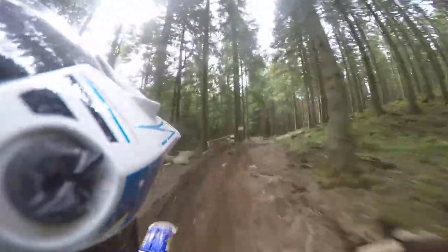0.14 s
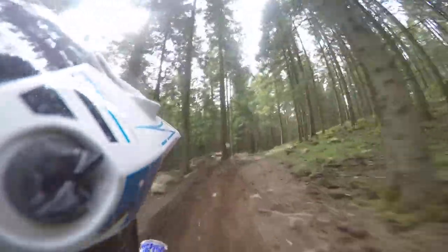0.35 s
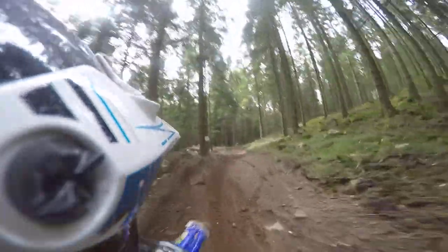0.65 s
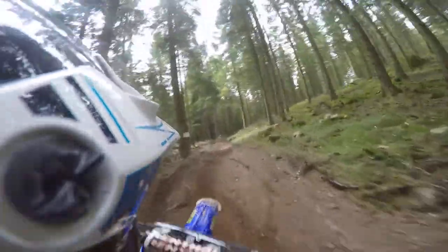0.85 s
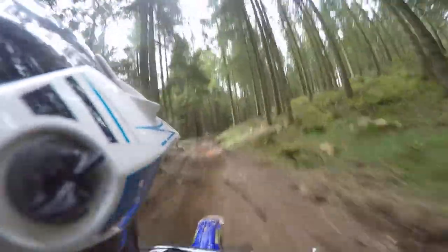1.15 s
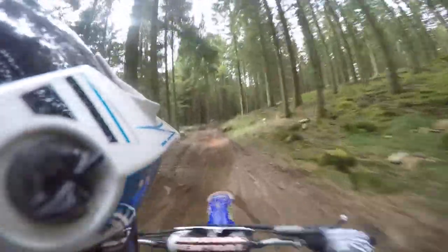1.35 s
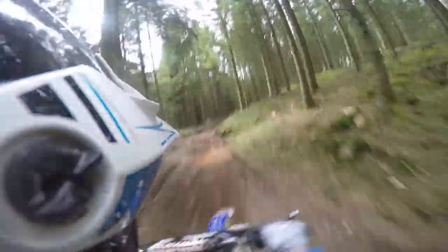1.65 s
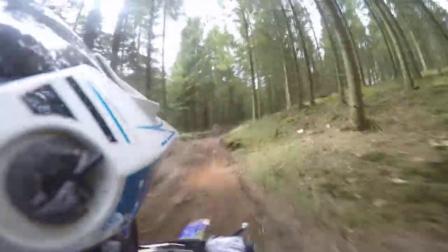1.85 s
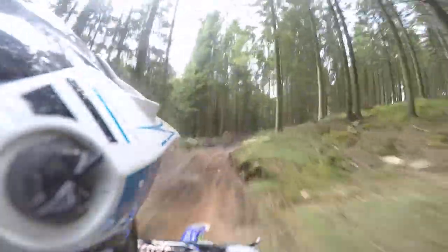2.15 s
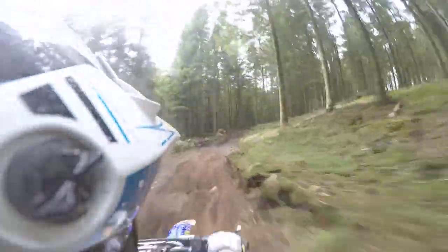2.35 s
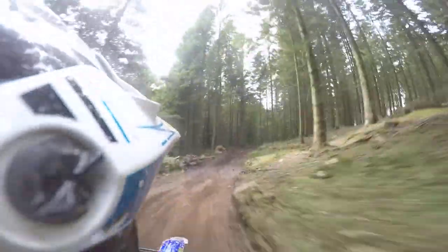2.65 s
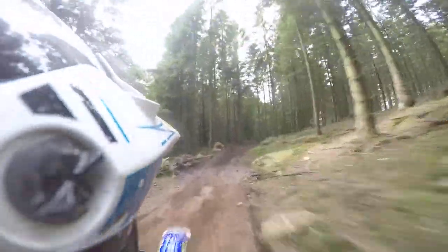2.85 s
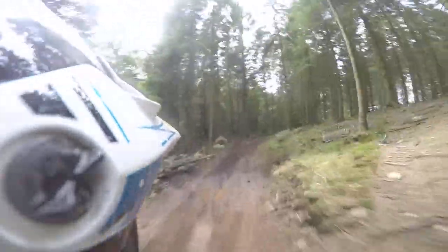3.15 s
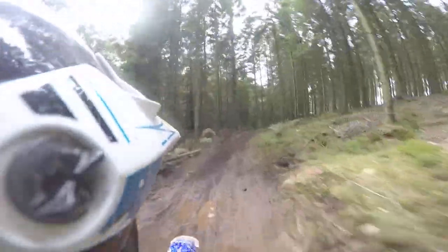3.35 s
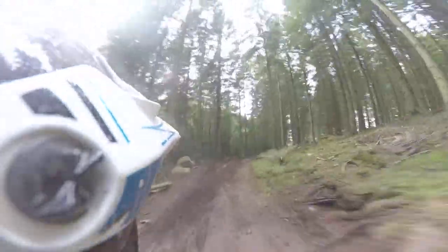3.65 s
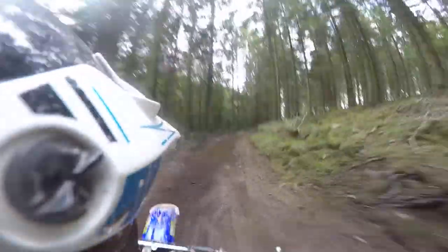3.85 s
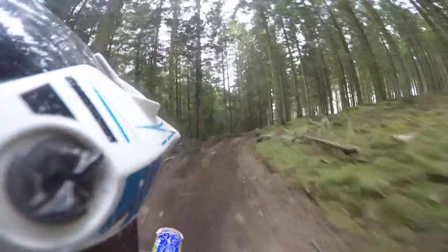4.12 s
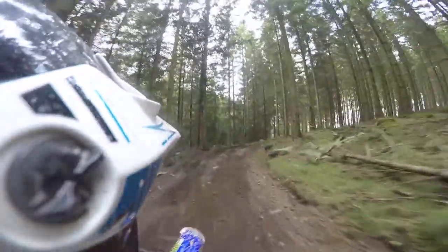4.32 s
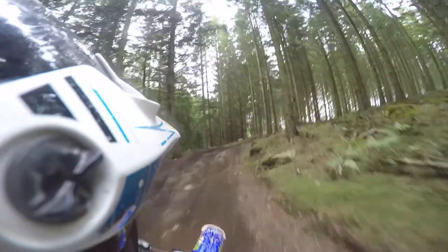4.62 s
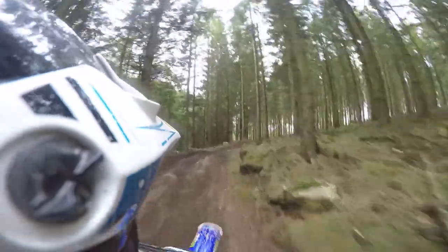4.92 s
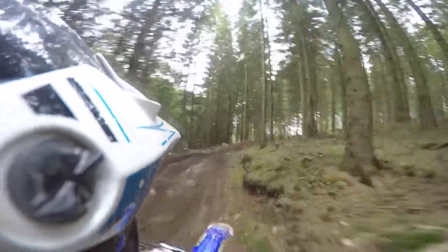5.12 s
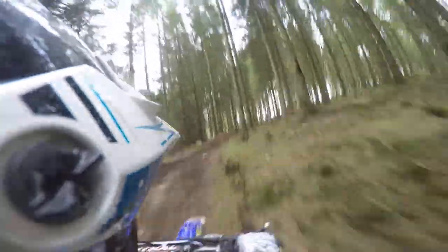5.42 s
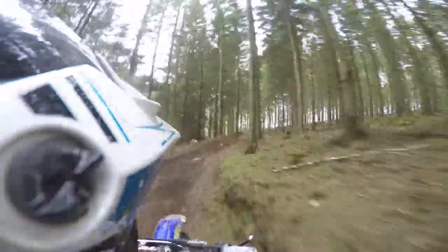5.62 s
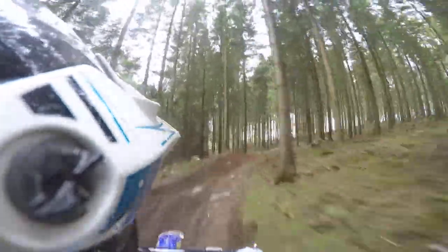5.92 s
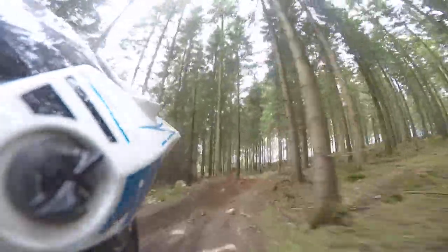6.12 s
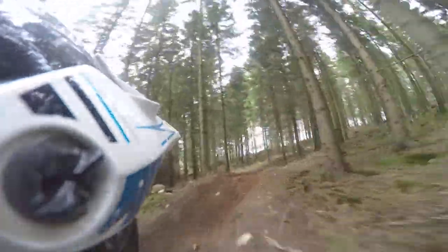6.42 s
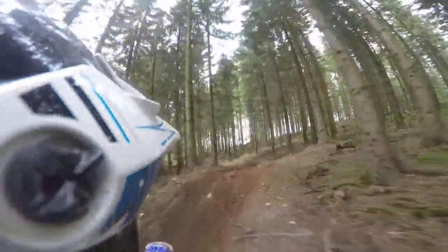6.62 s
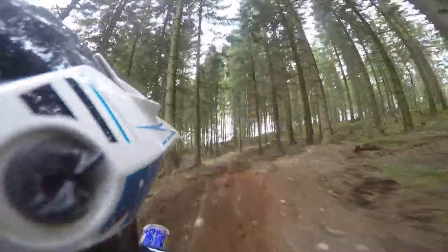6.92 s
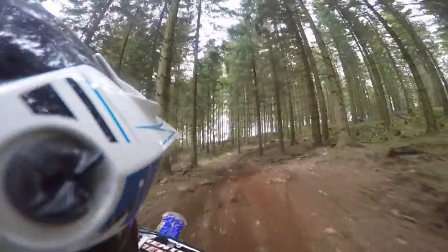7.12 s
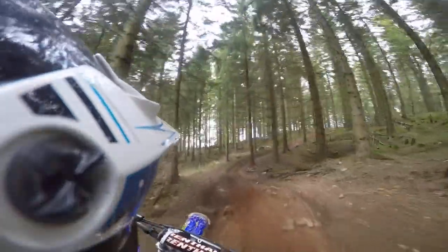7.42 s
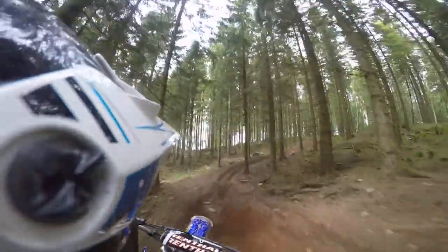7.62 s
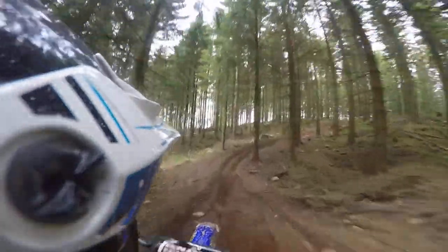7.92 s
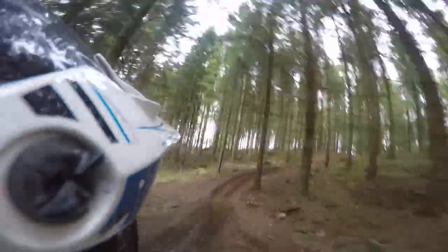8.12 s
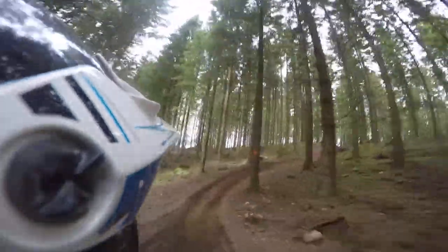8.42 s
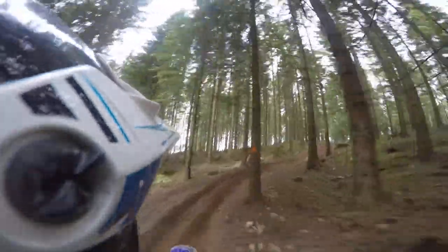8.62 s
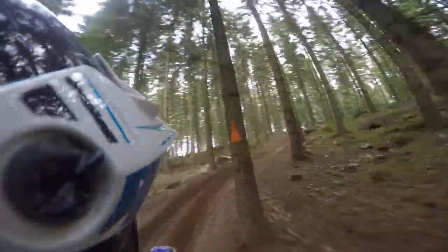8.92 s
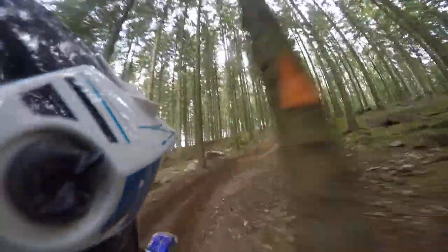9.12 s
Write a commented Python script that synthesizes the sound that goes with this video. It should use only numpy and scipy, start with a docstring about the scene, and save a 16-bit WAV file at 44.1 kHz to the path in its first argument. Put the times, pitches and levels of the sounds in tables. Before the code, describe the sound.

A two-stroke dirt bike snarls through forest, revving in ragged bursts, dropping to hollow popping overrun, with wind buffeting low at the rider's helmet.

```python
"""A two-stroke dirt bike on a forest track, with the microphone at the rider's helmet.
On the throttle every firing sends a sharp shock out of the exhaust and sets the pipe booming and the
silencer honking; the shocks scatter off bike, rider and ground, then off the trunks. Off the throttle the
engine pumps through the cold pipe and rattles, with stray pops. The chassis knocks over rough ground, and
wind, made of low shaped noise, buffets the microphone throughout."""
import sys
import numpy as np
from scipy import signal
from scipy.fft import rfft, irfft
from scipy.io import wavfile
from scipy.ndimage import uniform_filter1d

SR = 44100
rng = np.random.default_rng(int(sys.argv[2]) if len(sys.argv) > 2 else 0)


def wav_record(signal):
    """Record a signal, one row per channel, as 16-bit PCM in the file named by sys.argv[1]."""
    frames = np.transpose(np.atleast_2d(signal))
    bounded = np.clip(frames, -1, 1)
    # unit amplitude maps onto the largest positive 16-bit level
    quanta = np.round(bounded * 32767).astype(np.int16)
    wavfile.write(sys.argv[1], SR, quanta)


N = 408366
TIME = np.arange(N) / SR

# the tail of reflections off the trunks: time to fall by 60 dB [s]
TREES_T60_S = 0.42
# revs of ordinary raggedness [turns/s], and the steepness of the law
RAGGED_AT_HZ, RAGGED_POWER = 68.1, 0.94

# resonances of the silencer at the rest tuning and ordinary revs: (frequency [Hz], width [Hz], level [dB])
SILENCER_MODES = [(449.5, 71, 5), (523.6, 49, -1), (697, 110, -12), (1044, 84, -19)]
# hot gas tunes the silencer along with the pipe:
# the pipe resonance at which the silencer modes hold [Hz], and the share it follows (an exponent)
PIPE_REST_HZ, SILENCER_FOLLOWS = 291.3, 0.54
# faster gas flow brightens the silencer: [dB per octave for each turn/s above ordinary],
# up to these revs [turns/s]
BRIGHTEN_DB, FULL_FLOW_HZ = 0.41, 95.0
# the pipe's main resonance shifts with gas heat and flow; its width stays
BOOM_WIDTH_HZ = 100.0


def pipe(fired, turns, thump_hz=168.7, thump_width_hz=46.0, thump_db=-11.0, throb_db=-15.0):
    """Each firing thumps, sets the pipe booming and the silencer honking."""
    out = np.zeros(N)
    rates = revs(fired[:, 0])
    for (s, boom_db, boom_hz, honk_db, _), rate in zip(fired, rates):
        boom = ringing([(boom_hz, BOOM_WIDTH_HZ, 0), (thump_hz, thump_width_hz, thump_db)])
        heat = (boom_hz / PIPE_REST_HZ) ** SILENCER_FOLLOWS
        tilt_db = BRIGHTEN_DB * (min(rate, FULL_FLOW_HZ) - RAGGED_AT_HZ)
        honk_modes = []
        for hz, width, db in SILENCER_MODES:
            octaves_up = np.log2(hz / SILENCER_MODES[0][0])
            honk_modes.append((hz * heat, width, db + tilt_db * octaves_up))
        honk = ringing(honk_modes)
        add(out, s, from_db(boom_db) * at_rate(boom, rate) + from_db(honk_db) * at_rate(honk, rate))
    # reflections off the trunks
    out = out + from_db(-16) * through(out, scatter(TREES_T60_S))
    # the pulsing gas flow throbs at the firing rate itself; steady flow makes no sound
    boom_level = at_time(fired[np.argsort(fired[:, 0])], TIME)[0]
    throb = throttle() * from_db(boom_level + throb_db) * np.sin(2 * np.pi * turns)
    return signal.lfilter(*signal.butter(2, 30, "high", fs=SR), out) + throb


# reflections off bike, rider and ground: time to fall by 60 dB [s]
SCATTER_T60_S = 0.056
PIPE_ROUND_TRIP_S = .0036


def shocks(fired, likeness=0.96, steep_from_hz=123.0, steep_span_hz=55.0, size=2048):
    """The bare shock fronts, and their near reflections, which change a little from firing to firing."""
    fronts, scattered = np.zeros(N), np.zeros(N)
    fresh = rng.standard_normal((1024, size))
    fade = unit_energy(from_db(-60 * np.arange(size) / SR / SCATTER_T60_S))
    paths = fresh[-1]
    for (s, *_, crack_db), rate, new in zip(fired, revs(fired[:, 0]), fresh):
        keep = min(likeness, 1) ** raggedness(rate)
        paths = keep * paths + np.sqrt(1 - keep ** 2) * new
        # at high revs the wave that returns down the pipe steepens into a stronger second shock
        share = np.clip((rate - steep_from_hz) / steep_span_hz, .03, .5)
        for delay, part in ((0, 1 - share), (PIPE_ROUND_TRIP_S, share)):
            height = from_db(crack_db) * np.sqrt(part * SR / rate)
            add(fronts, s + delay, np.array([height]))
            add(scattered, s + delay, height * paths * fade)
    return fronts, scattered


# spectrum of the crack before the sizzle: (frequency [Hz], relative level [dB per Hz])
CRACK_SPECTRUM = [(300, -7), (700, -6.5), (850, -6), (1130, -2.5), (1420, -8.5), (1800, -5), (2300, -3),
                  (3050, 0.5), (3520, -8.5), (4950, -3.5), (6500, -14.5), (8760, -23), (13800, -29.5),
                  (16000, -33)]
# reflections off bike, rider and ground, then off the trunks, before the dulling filter [dB]
SCATTER_DB, TREES_DB = -3.5, -14


def crack(fired, level_db=-4.0, jet_db=-3.0, jet_s=0.0052, dull_hz=8100.0, tip_hz=4630.0,
          tip_width_hz=3300.0, sizzle_db=0.0, sizzle_db_per_hz=0.1539, cruise_hz=70.0):
    """Shocks leave the tailpipe with a puff of jet noise; they sizzle more as the revs rise."""
    fronts, scattered = shocks(fired)
    fade = np.exp(-1 / (jet_s * SR))
    jet_power = signal.lfilter([1 - fade], [1, -fade], fronts ** 2 + 1e-18)
    jet = np.sqrt(jet_power * raggedness(revs(TIME))) * rng.standard_normal(N)
    # the tailpipe spreads each front over two quick swings (an all-pass)
    r = np.exp(-np.pi * tip_width_hz / SR)
    poles = [1, -2 * r * np.cos(2 * np.pi * tip_hz / SR), r * r]
    direct = signal.lfilter(poles[::-1], poles, fronts) + from_db(jet_db) * jet
    trees = from_db(TREES_DB) * through(fronts, scatter(TREES_T60_S))
    echoes = from_db(SCATTER_DB) * scattered + trees
    dulled = signal.lfilter(*signal.butter(1, min(dull_hz, SR / 2 - 1), fs=SR), echoes)
    sound = through(direct + dulled, colour(CRACK_SPECTRUM))
    # the top is split off by a crossover and follows the revs
    low, top = (crossover(sound, side) for side in ("low", "high"))
    sizzle = from_db(sizzle_db + sizzle_db_per_hz * (revs(TIME) - cruise_hz))
    return from_db(level_db) * (low + sizzle * top)


def crossover(sound, side, split_hz=7500):
    """One side of a crossover: a second-order filter run twice."""
    once = signal.butter(2, split_hz, side, fs=SR, output="sos")
    return signal.sosfilt(np.tile(once, (2, 1)), sound)


def bark(fired, bark_hz=1840.0, width_hz=290.0, bark_db=-12.5, below_hz=66.3, span_hz=5.3):
    """Lugging at low revs in a long pull, each firing has a hard bark."""
    s, crack_db = fired[:, 0], fired[:, -1]
    rate = revs(s)
    pulling = sum((s >= pull[0][0]) & (s < pull[-1][0]) for pull in PULL_REVS)
    lugging = pulling * np.clip((below_hz - rate) / span_hz, 0, 1)
    heights = lugging * from_db(crack_db + bark_db) * np.sqrt(SR / rate)
    return through(clicks(s, heights), ringing([(bark_hz, width_hz, 0)]))


# the boom dies away as the throttle closes: over [s], by [dB]
RELEASE_S, RELEASE_DB = 0.035, -17.5
# as the throttle opens, the turns before the first sharp firing burn softly: level per turn ahead of it [dB]
SOFT_TURNS, SOFT_BOOM_DB, SOFT_CRACK_DB = 3, -6.0, -32


def firings(turns, boom_spread_db=1.15, crack_spread_db=1.2, surge_db_per_hz=0.2431,
            honk_surge_db_per_hz=0.1644, jitter_s=0.000015):
    """Rows of (s, boom dB, boom Hz, honk dB, crack dB): one firing a turn while the throttle is open."""
    out = []
    for (start, end), load in zip(bursts(), loads()):
        first, last = np.interp([start, end], TIME, turns)
        turn = np.arange(-min(SOFT_TURNS, int(first)), last - first)
        s = np.interp(first + turn, turns, TIME)
        boom_db, honk_db, crack_db, boom_hz = at_time(load, s)
        # each brief surge of the revs hardens shock and honk
        surge = revs(s) - uniform_filter1d(revs(s), size=21, mode="nearest")
        # no two charges burn quite alike
        burn, shock, lag = rng.standard_normal((256, 3))[:len(s)].T * raggedness(revs(s))
        ahead = np.maximum(-turn, 0)
        burn_db = boom_spread_db * burn + SOFT_BOOM_DB * ahead
        closing = np.clip(1 - (end - s) / RELEASE_S, 0, 1)
        boom_db = boom_db + burn_db + RELEASE_DB * closing
        honk_db = honk_db + burn_db + honk_surge_db_per_hz * surge
        crack_db = crack_db + surge_db_per_hz * surge + crack_spread_db * shock + SOFT_CRACK_DB * ahead
        out.append([s + jitter_s * lag, boom_db, boom_hz, honk_db, crack_db])
    return np.hstack(out).T


# load during each long pull, one curve each, levels before the trims below:
# (time [s], pipe boom [dB], silencer honk [dB], shock crack [dB], pipe resonance [Hz])
PULL_LOADS = [
    [(0.482, -11, -13, -15, 265), (0.594, -15, -21.5, -19.5, 299), (0.782, -21.5, -31, -31, 287),
     (1.15, -16.5, -19.5, -25, 260), (1.304, -16, -22.5, -18.5, 286), (1.336, -20.5, -19, -23.5, 274),
     (1.414, -21, -21.5, -19.5, 306), (1.584, -20.5, -26, -20, 257), (1.61, -23, -35, -28, 272)],
    [(1.768, -14.5, -17.5, -20, 258), (1.79, -16, -18, -20, 247), (1.836, -10.5, -22, -17.5, 258),
     (1.866, -17.5, -27, -17, 276), (1.894, -16, -32, -19.5, 257), (1.924, -13, -17.5, -20, 260),
     (1.954, -21, -24, -17, 293), (1.988, -29, -27, -21, 320), (2.01, -36, -28, -22.5, 315)],
    [(3.047, -15.5, -24, -17, 344), (3.083, -13, -22.5, -21.5, 366), (3.133, -13, -35, -20, 324),
     (3.161, -19.5, -28, -18, 320), (3.223, -20, -21.5, -15, 293), (3.26, -9, -38, -22, 258)],
    [(4.446, -10.5, -19.5, -23, 278), (4.476, -14, -24, -28.5, 272), (4.56, -15, -20.5, -24.5, 267),
     (4.64, -12, -20.5, -22.5, 280), (4.732, -16, -22, -26, 321), (4.858, -15, -19.5, -25.5, 266),
     (4.896, -13, -20.5, -24, 278), (5.264, -15, -20.5, -23, 297), (5.3, -14, -18, -23, 301)],
    [(7.17, -13, -23, -28, 332), (7.286, -18, -19.5, -26, 286.4), (7.44, -13.5, -19, -23.5, 247),
     (7.752, -18, -18, -25.5, 279), (7.85, -18.5, -25, -20, 261), (7.964, -17, -16.5, -23.5, 280),
     (8.024, -19.5, -22, -20, 255), (8.068, -18.5, -19, -22, 271), (8.13, -19, -20, -18, 336)],
]


def loads(pull_boom_db=0.5, pull_honk_db=0.0, pull_crack_db=1.5, blip_honk_db=-7.5):
    """One load curve for each burst; a blip holds its load, with the honk a fixed step under the boom."""
    trims = (0, pull_boom_db, pull_honk_db, pull_crack_db, 0)
    pulls = [np.add(load, trims) for load in PULL_LOADS]
    blips = [[(start, boom_db, boom_db + blip_honk_db, crack_db, hz)]
             for start, *_, boom_db, crack_db, hz in THROTTLE_BLIPS]
    return pulls + blips


# stray firings on a nearly shut throttle, alone or two turns running, levels before the trims below:
# (time [s], crack [dB], boom [dB], firings [count])
STRAY_POPS = [(.2631, 2, -14, 1), (0.3035, 0.5, -20, 1), (3.6729, -5.5, -15.5, 2), (4.36, -6.5, -15.5, 1),
              (4.3946, -3.5, -9.5, 2), (5.414, -4.5, -11, 2), (5.552, -7.5, -15.5, 1),
              (5.632, -3.5, -12.5, 1), (6.136, -1, -10.5, 1), (6.172, 0.5, -10.5, 1),
              (6.2218, -1.5, -10.5, 2), (6.266, -0.5, -11, 2), (6.4782, 1.5, -10, 2), (6.5308, 1.5, -16, 2),
              (6.6022, -9, -16, 1), (6.6137, 4, -17, 1), (8.1758, -6, -19, 2), (8.5939, -2.5, -14.5, 1),
              (8.692, -4.5, -13, 1), (8.7573, -2.5, -12, 2), (8.804, -4, -12.5, 2), (8.8719, -4, -15, 2)]


def pops(boom_trim_db=-4.0, honk_trim_db=-11.0, crack_trim_db=-16.5, boom_hz=332.0,
         rise_s=0.001246, second_db=-2.0):
    """The same rows for stray firings; a second one follows a turn later, weaker."""
    rows = []
    for s, crack_db, boom_db, count in STRAY_POPS:
        for k in range(round(count)):
            weaker_db = k * second_db
            rows.append((s + rise_s + k / revs(s), boom_db + boom_trim_db + weaker_db, boom_hz,
                         boom_db + honk_trim_db + weaker_db, crack_db + crack_trim_db + weaker_db))
    return np.array(rows)


# long pulls on the throttle, one curve each; the revs flare whenever the rear wheel slips:
# (time [s], crankshaft speed [turns/s])
PULL_REVS = [
    [(.482, 71), (.52, 92), (.56, 120.4), (.61, 143.7), (.65, 123.9), (.7, 92.7), (.75, 79.8), (.92, 63.3),
     (1.02, 75.1), (1.08, 64.1), (1.16, 87.5), (1.21, 87.1), (1.29, 112.2), (1.34, 90.1), (1.45, 113.3),
     (1.5, 94.5), (1.58, 115), (1.63, 83.4)],
    [(1.768, 70.5), (1.84, 101.7), (1.9, 100), (1.96, 116), (2.026, 88.3)],
    [(3.047, 68), (3.1, 87.9), (3.15, 118.3), (3.2, 103.9), (3.268, 120)],
    [(4.446, 61.4), (4.56, 57.8), (4.73, 75.9), (4.83, 59.8), (4.89, 69.2), (4.96, 68.5), (5.04, 85.4),
     (5.1, 74.8), (5.18, 83.7), (5.24, 79.4), (5.308, 87.9)],
    [(7.17, 55.8), (7.28, 53), (7.4, 60.7), (7.53, 59.4), (7.6, 64.9), (7.72, 58.5), (7.83, 73.6),
     (7.93, 91.6), (8.01, 75.2), (8.08, 91.2), (8.141, 109.4)],
]
# short blips of the throttle: (start [s], end [s], speed at the start [turns/s], speed at the top [turns/s],
# boom [dB], crack [dB], pipe resonance [Hz])
THROTTLE_BLIPS = [(.01, 0.07, 62.6, 77, -14, -23, 265), (2.256, 2.418, 76, 89, -17.5, -21, 299),
                  (3.55, 3.646, 44, 63, -23, -28.5, 262), (3.721, 3.843, 72, 73, -17.5, -20.5, 304),
                  (5.47, 5.527, 71.3, 78, -12.5, -19, 310), (5.663, 5.853, 65, 68.5, -16, -21.5, 286),
                  (6.802, 6.915, 54, 59.5, -17, -21.5, 304), (8.472, 8.544, 72, 85, -16.5, -18, 300),
                  (8.925, 9.095, 59.4, 70, -16.5, -20.5, 303.5), (9.21, 9.282, 51.5, 62, -20, -22, 344)]
# engine speed while rolling with the throttle shut: (time [s], crankshaft speed [turns/s])
SHUT_REVS = [(.2, 76), (.45, 66), (2.47, 70), (2.6, 64.5), (2.85, 66), (3.36, 92), (3.48, 58), (3.95, 49),
             (4.32, 48), (5.4, 68), (6.05, 55), (6.32, 73), (6.46, 67.5), (6.54, 83), (6.62, 84),
             (6.72, 62), (7.11, 45), (8.35, 66)]
# in a blip the revs climb towards the top for this long [s], then sag under load [turns/s per s]
CLIMB_S, SAG_HZ_PER_S = .075, 35.0


def revs(s):
    """Turns of the crankshaft per second at the times s, through pulls, blips and coasting."""
    points = [row for curve in PULL_REVS + [SHUT_REVS] for row in curve]
    for start, end, low, top, *_ in THROTTLE_BLIPS:
        climb = min(CLIMB_S, end - start)
        reached = low + (top - low) * climb / CLIMB_S
        sagged = reached - SAG_HZ_PER_S * (end - start - climb)
        points += [(start, low), (start + climb, reached), (end, sagged)]
    return at_time(sorted(points), s)[0]


def bursts():
    """(start s, end s) of every opening of the throttle: pulls, then blips."""
    return [(pull[0][0], pull[-1][0]) for pull in PULL_REVS] + [blip[:2] for blip in THROTTLE_BLIPS]


def throttle():
    """1 while the engine fires, 0 while it coasts, with short smooth edges."""
    is_open = sum((TIME >= start) & (TIME < end) for start, end in bursts())
    return uniform_filter1d(is_open.astype(float), 1024)


def raggedness(rate):
    """How much one firing differs from the next: 1 at ordinary revs, evening out as they climb."""
    return (RAGGED_AT_HZ / rate) ** RAGGED_POWER


def at_rate(response, rate):
    """Scale unit energy to about unit rms at this rate; it swells where a harmonic meets a resonance."""
    return response * np.sqrt(SR / rate)


# resonances of the exhaust when no charge burns: (frequency [Hz], width [Hz], level [dB])
COLD_PIPE_MODES = [(344, 76, 6), (478, 55, 2), (585, 280, -27), (1055, 120, -12.5)]
# spectrum of the loose parts at the helmet: (frequency [Hz], relative level [dB per Hz])
RATTLE_SPECTRUM = [(200, 9), (500, 9.5), (700, 0.5), (1100, -2), (1600, -5.5), (2200, -8), (2950, -1.5),
                   (3550, -14.5), (4800, -9.5), (8000, -25), (15000, -42)]
# pumping and rattle, levels before the trims below: (time [s], pumping drone [dB], rattle [dB])
COAST_LEVELS = [(.2, -23.5, -41), (.45, -30, -39), (1.7, -52, -38.5), (2.12, -37.5, -47.5),
                (2.52, -36, -43.5), (2.8, -25, -41.5), (3.0, -31, -34), (3.36, -41, -42),
                (3.46, -39, -51.5), (3.95, -36.5, -48.5), (4.32, -23.5, -43.5), (5.4, -31, -38),
                (6.05, -26.5, -46.5), (6.42, -21.5, -38), (6.72, -29, -46.5), (7.11, -25, -48.5),
                (8.35, -42, -49), (8.7, -28, -44.5)]


def overrun(turns, drone_db=-3.5, rattle_db=11.0, slap_depth=0.16, flutter_db=2.5, hiss_db=-9.5):
    """Unfired strokes puff through the cold pipe; piston, chain and tyres rattle."""
    drone_level, rattle_level = at_time(COAST_LEVELS, TIME)
    s = np.interp(np.arange(1, turns[-1]), turns, TIME)
    puffs = rms_one(clicks(s, np.ones(len(s)))) + from_db(hiss_db) * rng.standard_normal(N)
    drone = rms_one(through(puffs, ringing(COLD_PIPE_MODES))) * (1 - throttle())
    # the piston slaps at both ends of its stroke
    slaps = (1 + slap_depth * np.cos(4 * np.pi * turns)) * from_db(flutter_db * drift(10.6))
    rattle = rms_one(through(slaps * rng.standard_normal(N), colour(RATTLE_SPECTRUM)))
    drone_gain = from_db(drone_level + drone_db + SWELL_DB * swell())
    return drone_gain * drone + from_db(rattle_level + rattle_db) * rattle


# the pumping swells just before the throttle opens: over [s], by [dB]
SWELL_S, SWELL_DB = 0.024, 11.5


def swell():
    """Rises from 0 to 1 just before each opening of the throttle."""
    rises = [np.clip(1 - (start - TIME) / SWELL_S, 0, 1) * (TIME < (start + end) / 2)
             for start, end in bursts()]
    return np.max(rises, axis=0)


# the chassis knocks over rough ground: (time [s], level before the gain below [dB])
CHASSIS_KNOCKS = [(1.7026, -7), (2.069, -12.5), (2.9503, -4), (2.9627, -17), (2.9839, -8)]


def knocks(gain_db=13.5, t60=0.043):
    """Bumps make the loose parts clatter briefly."""
    s, knock_db = np.transpose(CHASSIS_KNOCKS)
    clatter = through(clicks(s, from_db(knock_db + gain_db)), scatter(t60))
    return through(clatter, colour(RATTLE_SPECTRUM))


# wind on the microphone, before the trim below: (time [s], level [dB])
WIND_LEVEL = [(0.0, -19), (0.57, -29.5), (0.59, -30), (1.99, -27), (2.06, -32), (2.21, -22), (2.27, -27.5),
              (3.09, -20.5), (3.38, -35), (4.18, -22.5), (4.23, -26.5), (4.72, -19), (4.98, -26.5),
              (5.75, -15.5), (6.47, -21), (6.55, -28), (6.86, -19.5), (7.71, -16.5), (8.79, -22.5),
              (8.85, -18), (9.0, -18.5), (9.26, -17.5)]
# spectrum of the buffeting: (frequency [Hz], relative level [dB per Hz])
BUFFET_SPECTRUM = [(12, -8.5), (25, -3), (42, 2.5), (65, 1.5), (120, -8.5), (200, -13.5), (400, -24),
                   (1000, -36), (4000, -67)]


def wind(trim_db=1.5, lumps_db=1.5):
    """Lumpy low turbulence round the helmet."""
    air = through(rng.standard_normal(N), colour(BUFFET_SPECTRUM)) * from_db(lumps_db * drift(9.6))
    return from_db(at_time(WIND_LEVEL, TIME)[0] + trim_db) * rms_one(air)


def from_db(db):
    """Decibels to gain."""
    return 10 ** (np.asarray(db) / 20)


def rms_one(x):
    """Scale to unit rms."""
    return x / np.sqrt(np.mean(x ** 2) + 1e-20)


def unit_energy(x):
    """Scale a response to unit energy."""
    return x / np.sqrt(np.sum(x ** 2) + 1e-20)


def at_time(rows, s):
    """Read every column of a curve table at the times s."""
    times, *columns = np.transpose(rows)
    return [np.interp(s, times, c) for c in columns]


def drift(rate):
    """Slow chance of spread 1: noise at a 40th of the sample rate, smoothed by two poles at rate Hz."""
    r = np.exp(-80 * np.pi * rate / SR)
    noise = rng.standard_normal(N // 40 + 2002)
    slow = signal.lfilter([1], [1, -2 * r, r * r], noise)[2000:]  # settled part only
    return np.interp(np.arange(N) / 40, np.arange(len(slow)), rms_one(slow))


def through(x, response):
    """Pass a sound through an impulse response."""
    return signal.oaconvolve(x, response)[:N]


def colour(spectrum, size=8192):
    """Causal (minimum-phase) response with the given spectrum shape and unit energy."""
    hz, db = np.transpose(spectrum)
    grid = np.maximum(np.fft.rfftfreq(size, 1 / SR), 1)
    gain = from_db(np.interp(np.log(grid), np.log(hz), db))
    # folding the cepstrum onto positive times gives minimum phase
    cepstrum = irfft(np.log(gain))
    cepstrum[1:size // 2] *= 2
    cepstrum[size // 2 + 1:] = 0
    return unit_energy(irfft(np.exp(rfft(cepstrum))))


def ringing(modes, size=2048):
    """Response of parallel resonances that swell, then die away (steep skirts); unit energy."""
    t = np.arange(size) / SR
    total = 0
    for hz, width, db in modes:
        envelope = width ** 2 * t * np.exp(-np.pi * width * t)
        total = total + from_db(db) * envelope * np.sin(2 * np.pi * hz * t)
    return unit_energy(total)


def scatter(t60, size=8192):
    """Dense reflections that die away, unit energy."""
    return unit_energy(rng.standard_normal(size) * from_db(-60 * np.arange(size) / SR / t60))


def clicks(s, heights):
    """One click at each time."""
    return np.bincount(np.clip(np.round(s * SR).astype(int), 0, N), heights, N + 1)[:N]


def add(track, s, sound):
    """Mix a sound into a track at time s."""
    room = track[max(int(round(s * SR)), 0):][:len(sound)]
    room += sound[:len(room)]


def scene():
    """Engine, chassis and wind at the helmet."""
    turns = np.cumsum(revs(TIME)) / SR
    driven = firings(turns)
    fired = np.vstack([driven, pops()])
    engine = pipe(fired, turns) + crack(fired) + bark(driven) + overrun(turns)
    return (engine + knocks() + wind())[None]


def record(dry, ceiling=1.03, cutoff_hz=15800):
    """The tallest shocks are rounded off and the top is cut."""
    rounded = dry / (1 + (dry / ceiling) ** 4) ** (1 / 4)
    return signal.sosfilt(signal.ellip(10, .1, 80, cutoff_hz, fs=SR, output="sos"), rounded)


dry = scene()
out = record(dry)
wav_record(out)
```